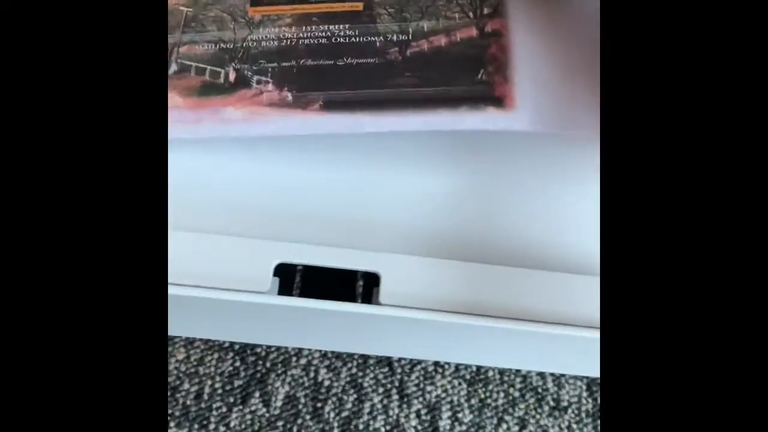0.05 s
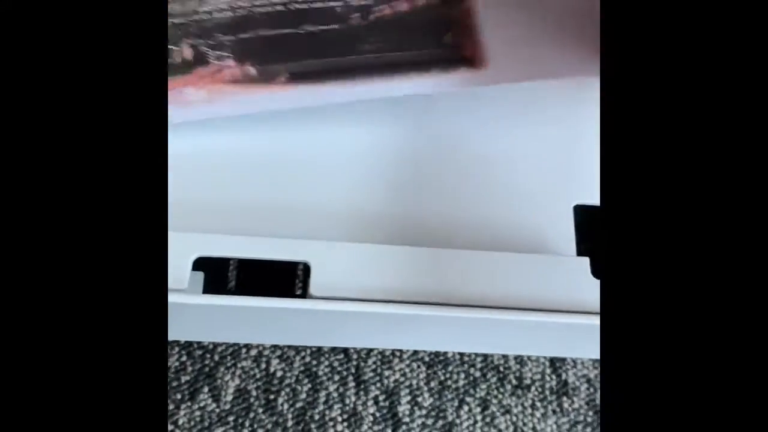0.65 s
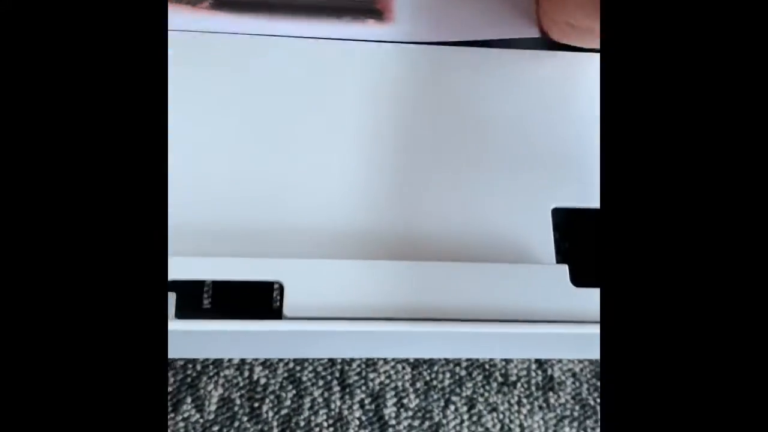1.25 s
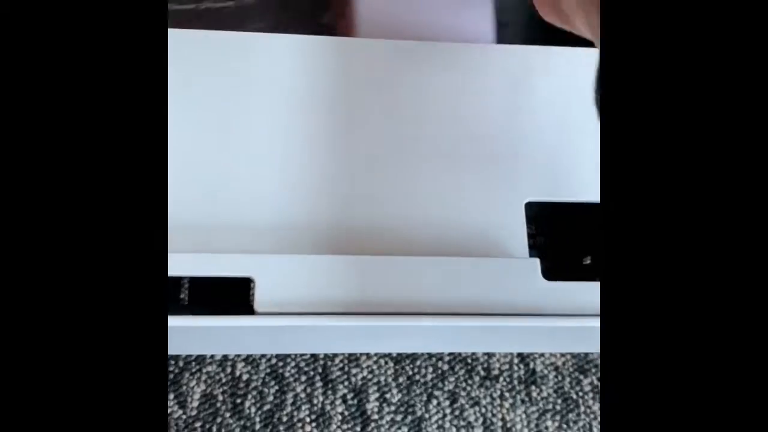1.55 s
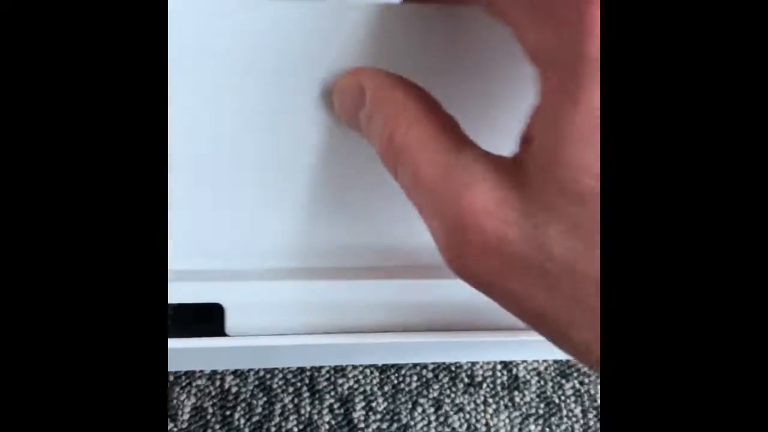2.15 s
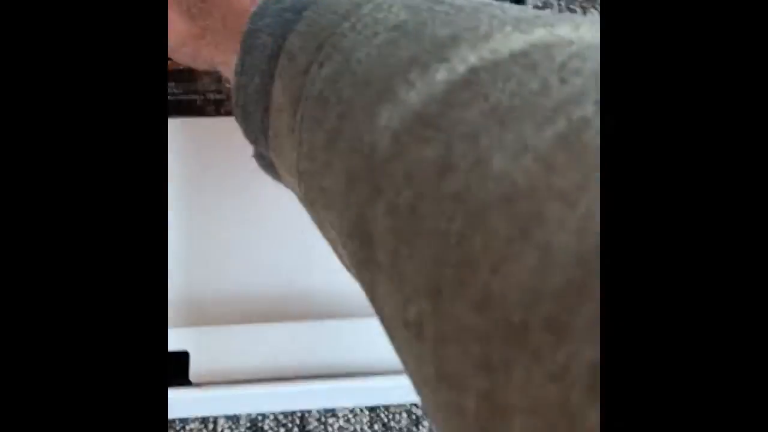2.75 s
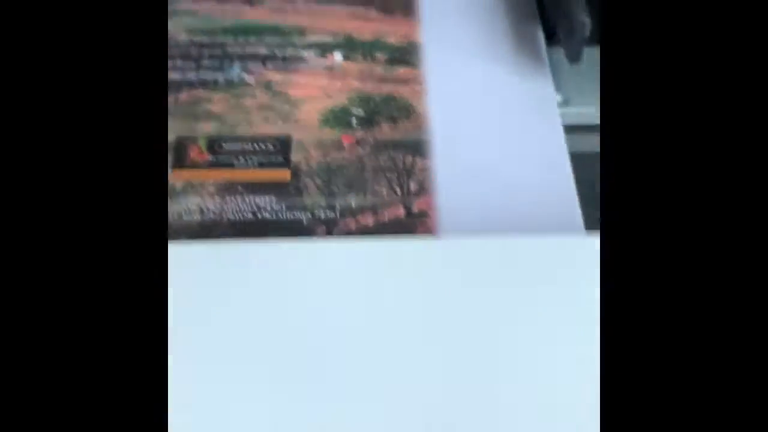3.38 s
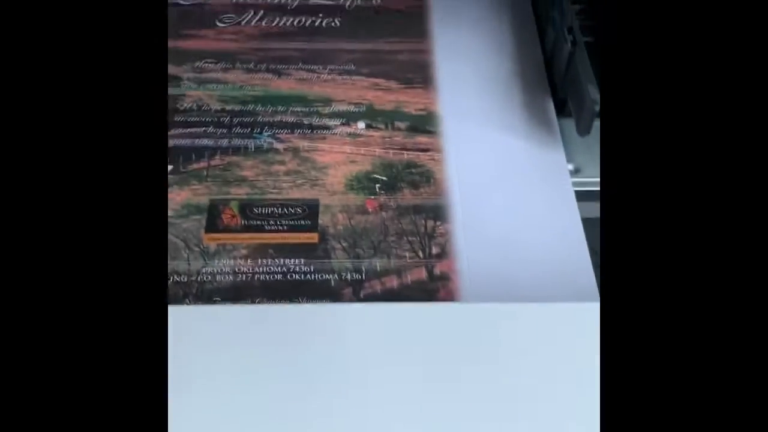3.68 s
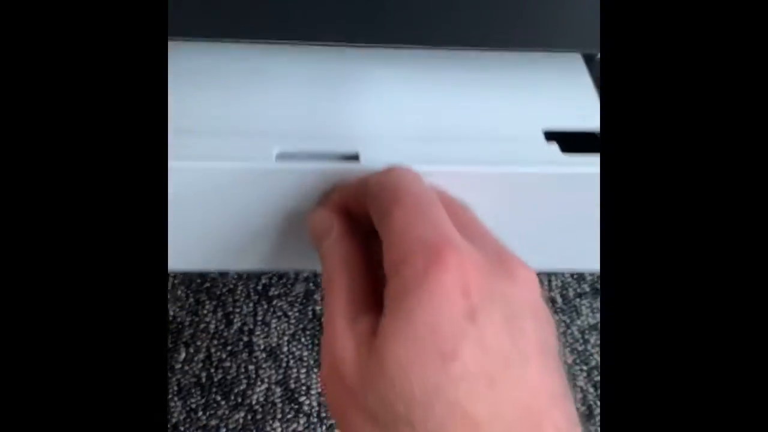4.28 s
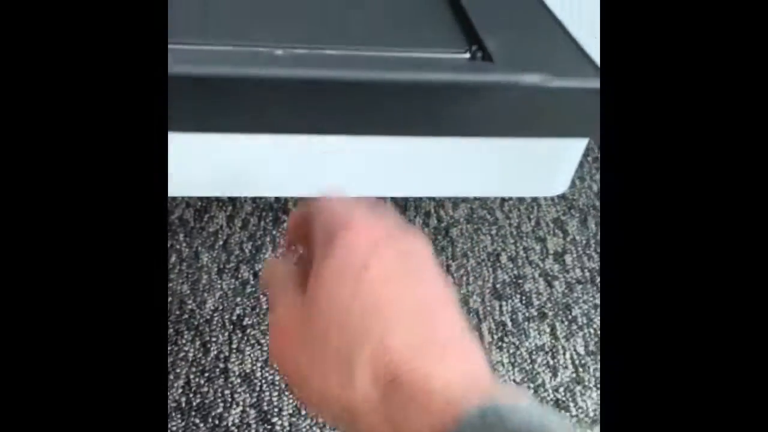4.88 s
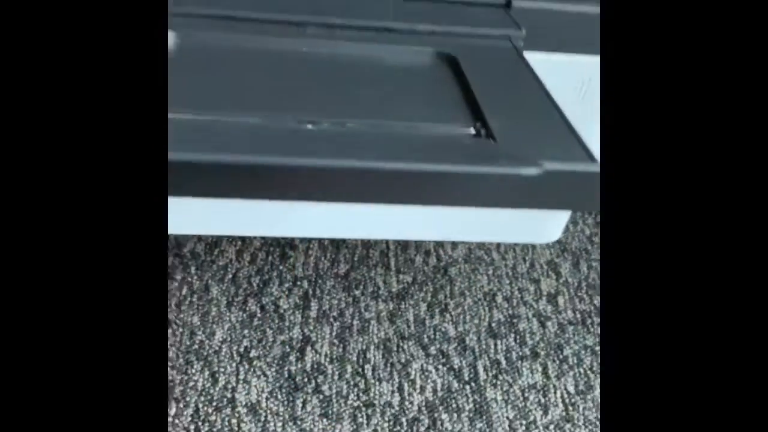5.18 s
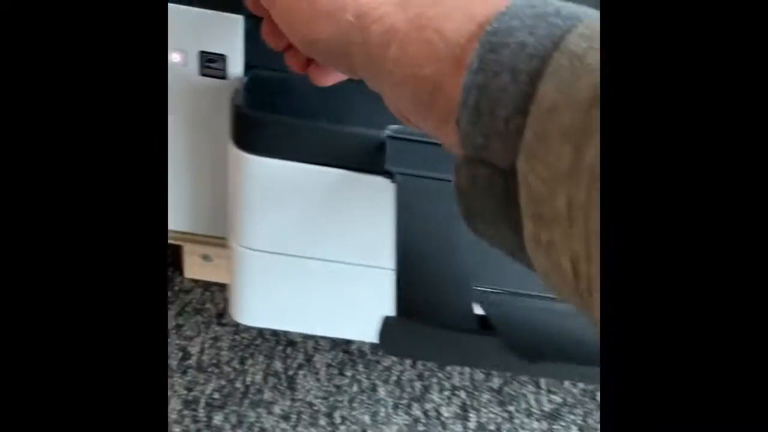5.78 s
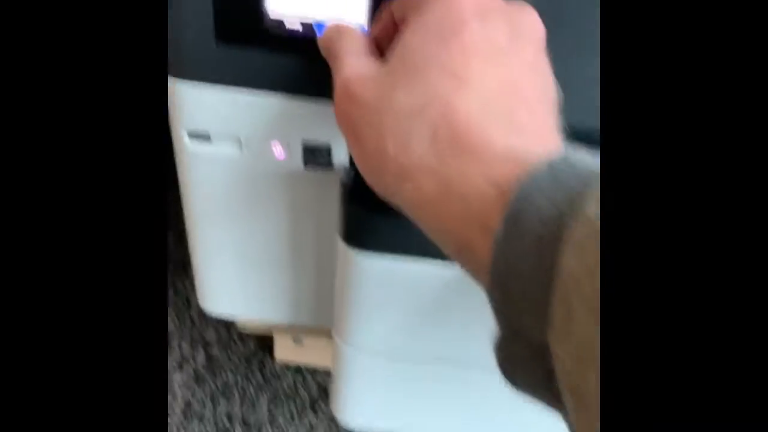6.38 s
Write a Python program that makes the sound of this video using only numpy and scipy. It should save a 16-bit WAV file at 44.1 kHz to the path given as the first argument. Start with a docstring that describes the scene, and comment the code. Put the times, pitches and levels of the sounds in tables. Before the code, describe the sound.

A machine hums low and steady in a room while paper rustles and taps lightly in a plastic printer tray, heard from close by. A quick run of plastic clicks and a few knocks follow as the guides are pushed up to the stack. Then the tray scrapes and clatters inward and shuts with a clunk, leaving only the hum and faint air.

```python
"""A carpeted room, close to a printer: sheets of paper are laid into its plastic tray.
The stack taps and rubs against the tray, the guides are pushed up to it, and the tray slides in
and latches. Impacts excite damped modes of paper and plastic; sliding makes stick-slip noise.
A machine hums low and steady behind it all, over the faint rush of the room air."""
import sys
import numpy as np
from scipy import signal
from scipy.fft import rfft, irfft, next_fast_len
from scipy.io import wavfile

SR = 44100
rng = np.random.default_rng(int(sys.argv[2]) if len(sys.argv) > 2 else 0)


def materialize(psi):
    """Save the field psi as 16-bit PCM at rate SR to the path in sys.argv[1].

    A 1-D psi becomes a single channel; in a 2-D psi each row is a channel.
    """
    bounded = np.clip(np.atleast_2d(psi).T, -1, 1)
    quanta = np.round(bounded * 32767).astype(np.int16)
    wavfile.write(sys.argv[1], SR, quanta)


N = 292817

EDGES = 25 * 2 ** np.arange(0, 9.6, .5)   # half-octave bands, Hz
CENTRES = np.sqrt(EDGES[1:] * EDGES[:-1])
# Spectra of the noises. Each row: frequency in Hz, spectral level in dB.
AIR_SPECTRUM = [(25, -52.5), (50, -38.5), (100, -44), (200, -47.5), (400, -49.5), (700, -55.5),
                (1200, -58.5), (2500, -68), (4500, -77), (6500, -95.5), (15000, -92)]
RUMBLE_SPECTRUM = [(30, -3.5), (80, 7.5), (180, 10), (400, -6), (900, -30.5), (3000, -59.5)]
RUB_SPECTRUM = [(100, 3.5), (250, 4.5), (500, 3.5), (900, -3), (1400, -5), (2000, 3.5), (4500, -10),
                (6500, -2), (9000, -7), (15000, -8)]
KNOCK_SPECTRUM = [(40, -12), (100, -7), (200, -2.5), (400, -4), (800, -6), (1400, -5), (2000, 5),
                  (4500, -7.5), (6000, -5), (9000, 2), (15000, -12)]
TAP_SPECTRUM = [(40, -12.5), (100, -2), (200, 13.5), (400, -6), (800, -4), (1400, -5), (2000, 6),
                (4500, -9), (6000, -5.5), (9000, -3), (15000, -8.5)]
# Likeness of the channels for air and near sounds. Each row: frequency in Hz, coherence from 0 to 1.
AIR_COHERENCE = [(100, 0.93), (300, 0.61), (700, 0.15), (2000, .1), (6000, 0.33), (9000, 1)]
NEAR_COHERENCE = [(100, .95), (600, .95), (1400, .75), (2100, .75), (3500, .4), (5500, .5), (8000, .94),
                  (15000, .92)]
# Balance of the near sounds. Each row: frequency in Hz, left over right in dB.
BALANCE = [(120, 1.5), (280, 0), (550, 5), (1000, 7), (1500, 1), (2200, 2), (4000, -1.5), (8000, -0.5),
           (15000, 0.5)]
# Partials of the hum. Each row: frequency in Hz, level in dB.
HUM_PARTIALS = [(123.8, -52), (166.9, -60.5), (215.3, -70.5), (253.0, -64.5), (290.7, -61), (355.3, -79.5)]
# The hum weakens at the end as the listener rises from the tray. Each row: time in seconds, gain in dB.
HUM_NEARNESS = [(0, 1.5), (5.2, 3), (6.6, 0)]
# Decay of the room and of the dense panel modes. Each row: frequency in Hz, T60 in seconds.
ROOM_T60 = [(100, 0.6), (500, 0.25), (2000, 0.32), (5000, 0.35), (9000, 0.061), (15000, 0.16)]
PANEL_T60 = [(100, 0.21), (400, .11), (1000, 0.082), (3000, 0.08), (8000, 0.048), (15000, 0.019)]
# Strongest modes of each part. Each row: frequency in Hz, bandwidth in Hz, gain in dB.
HOUSING_MODES = [(176.7, 13, 3.5), (325, 95, 3.5), (438, 20, -15), (580.6, 32, 6.5), (982, 17, 9),
                 (1155, 34, 3), (1580, 79, -0.5), (2427, 110, -7.5), (2767, 14, -5.5), (3480, 40, 8),
                 (3980, 42, -2.5), (7910, 120, -2)]
TRAY_MODES = [(172, 29, 0), (401, 64, 3), (570.6, 61, -9.5), (742, 47, 0), (893, 19, 6), (1284, 54, -5.5),
              (1459, 26, 6.5), (2146, 60, 3.5), (2560, 310, -11), (3330, 198.6, -7), (4187, 60, -12),
              (7700, 170, -20)]
GUIDE_MODES = [(178.6, 21, -1), (425, 38, -0.5), (630, 60, -4), (674, 36, 5.5), (910, 66, 2),
               (1010, 70, -11.5), (1560, 23, 7), (1754, 17, -6.5), (2007, 49, 2), (2470, 93, 1.5),
               (3240, 61, -2), (3630, 23.7, -3.5), (4730, 44, 6.5)]
PAPER_MODES = [(412.6, 12, 3.5), (620, 78, 1), (729, 35, -1.5), (822, 18, 7.5), (1070, 50, -10.5),
               (1170, 30, -1), (1570, 20, -7), (1900, 74, -7), (2024, 80.7, -2), (2600, 40, -1.5),
               (3530, 110, 2), (4060, 29, -14.5), (5150, 200, 5.5), (8150, 520, -11)]
# The rolling tray shakes the housing. Each row: start in seconds, length in seconds, level in dB.
TRAY_ROLLS = [(4.04, 0.11, -40.5), (4.557, 0.027, -29), (4.639, 0.1, -28)]
# The tray meets the housing, then the end stop. Each row: start in seconds, level in dB.
BOOMS = [(4.562, -24), (4.681, -19)]
# Blows with one clear pitch. Each row: start in seconds, frequency in Hz, level in dB.
PINGS = [(0.062, 790, -17.5), (0.558, 4760, -40), (0.619, 1183, -19.5), (0.671, 2350, -19),
         (0.924, 1600, -17.5), (0.987, 4910, -14), (1.112, 4910, -20.5), (1.111, 3750, -24),
         (1.2978, 1022, -21), (1.302, 580, -29), (1.55, 1240, -20.5), (2.765, 586, -11),
         (2.910, 417, -12.5), (4.482, 1070, -17), (4.762, 3000, -27.5), (4.868, 2720, -29)]
# The tray slides on its runners, and sheet over sheet.
# Each row: start in seconds, length in seconds, level in dB, hiss against body in dB.
TRAY_PUSHES = [(3.475, 0.15, -44.5, -8.5), (3.66, 0.033, -53.5, -5), (3.78, 0.44, -42, -14.5),
               (3.965, 0.067, -30, -10.5), (4.06, 0.15, -43, -14.5), (4.26, 0.23, -50, -10.5),
               (4.525, 0.23, -37.5, -18.5), (4.79, 0.14, -51.5, -32)]
PAPER_STROKES = [(0.0, 0.012, -41, -11.5), (0.06, 0.077, -43.5, -13.5), (0.235, 0.069, -44.5, -19),
                 (0.47, 0.15, -47, -8), (0.68, 0.05, -47, -18), (0.75, 0.082, -47, -10),
                 (0.89, 0.17, -44, -7.5), (1.07, 0.17, -47, -13.5), (1.34, 0.16, -42.5, -15.5),
                 (1.51, 0.19, -42.5, -17), (1.735, 0.065, -43.5, -16), (1.96, 0.036, -35, -18),
                 (2.04, 0.07, -44, -23), (2.29, 0.16, -44, -22), (2.38, 0.02, -27, -9.5),
                 (2.45, 0.055, -42, -22.5), (2.55, 0.037, -47, -26), (2.615, 0.061, -55, -6),
                 (2.80, 0.12, -41, -21), (2.90, 0.016, -38, -28)]
# Stick-slip. Each holds: catches per second, size against the steady rub, decay in seconds, grit in dB.
RUNNER_CATCHES = (75, 1.9, .003, 2.8)
PAPER_CATCHES = (55, 3.1, .003, 3.2)
# Impacts on plastic. Each row: start in seconds, level in dB, treble against body in dB.
HOUSING_KNOCKS = [(4.483, -17.5, -4.5), (4.561, -17, -9.5), (4.573, -18.5, -15.5), (4.585, -21.5, -10.5),
                  (4.604, -20.5, -13), (4.64, -15.5, -7), (4.659, -12.5, -9), (4.672, -6.5, -11.5),
                  (4.682, -8.5, -7), (4.693, -9, -13), (4.734, -22, -17), (4.865, -31, -8.5),
                  (6.153, -40, -25)]   # the latch, the end stop, a last touch
TRAY_KNOCKS = [(3.483, -34.5, -25), (3.528, -19.5, -14), (3.557, -22, -20), (3.596, -21, -24),
               (3.609, -19, -18), (3.681, -26, -17), (3.763, -14.5, -36), (3.774, -10, -23),
               (3.871, -20, -19.5), (3.95, -22.5, -3.5), (3.967, -7, -16.5), (4.002, -5, -11),
               (4.022, -8.5, -32), (4.035, -11.5, -12.5), (4.072, -16, -14.5), (4.139, -17, -19.5),
               (4.175, -27, -19), (4.206, -23, -34)]   # the tray rattles on its way in
GUIDE_KNOCKS = [(2.35, -28, -12.5), (2.378, -9, -7.5), (2.391, -4, -10), (2.405, -7.5, -6.5),
                (2.422, -14.5, -8), (2.433, -11.5, -12.5), (2.497, -27, -13), (2.745, -23.5, -10),
                (2.761, -9, -13), (2.774, -12.5, -38), (2.818, -42, -1), (2.908, -14.5, -11)]   # the guides ratchet along and knock home
# Sheets tap and flick in the tray. Each row: start in seconds, level in dB,
# treble against body in dB, factor on the decay time, leftward pan in dB.
PAPER_TAPS = [(0.062, -13.5, -27.5, 0.68, 2.5), (0.072, -15.5, -24, 0.7, 0), (0.26, -33.5, -15.5, .9, 1),
              (0.358, -23, -37, 1.1, 1), (0.465, -27.5, -24, 0.54, 1), (0.556, -25, -8.5, 0.78, -0.5),
              (0.618, -16, -14.5, 0.89, 1), (0.67, -16.5, -16.5, 0.58, 2), (0.718, -26, -50, 1, 1),
              (0.875, -23.5, -16, .9, 0.5), (0.925, -16, -11, 0.83, 0.5), (0.986, -15.5, -11.5, 0.73, 0),
              (1.112, -34.5, 6, 0.32, -5), (1.158, -17.5, -33, 0.95, -0.5), (1.3, -6, -24.5, 0.6, 0),
              (1.364, -25.5, -14, 0.77, 2), (1.49, -13.5, -16, 0.8, 2), (1.534, -25.5, -18, 1.4, 3.5),
              (1.675, -29, -13, 1.16, 1), (1.967, -21, -17.5, 0.89, -7.5), (1.976, -18.5, -12.5, 1.17, 6),
              (2.021, -31, -8.5, 0.93, 1)]


def from_db(db):
    """Amplitude ratio of a level in decibels."""
    return 10 ** (np.asarray(db) / 20)


def per_band(points):
    """A curve interpolated in log frequency at the band centres."""
    hz, values = np.transpose(points)
    return np.interp(np.log(CENTRES), np.log(hz), values)


def drift(rate_hz, count=N):
    """A slow random fluctuation of unit variance."""
    knots = rng.standard_normal(8192)
    return np.interp(np.arange(count) / SR * rate_hz, np.arange(len(knots)), knots) * np.sqrt(3 / 2)


def band_pass(x, k):
    """Band k, scaled so that white noise keeps its power per kilohertz of width."""
    sos = signal.butter(2, EDGES[k:k + 2], "band", fs=SR, output="sos")
    return signal.sosfilt(sos, x + 1e-18) * np.sqrt(SR / 2000)


def stereo(mid, side, coherence):
    """In-phase and antiphase signals mix into two channels of given coherence."""
    return np.sqrt((1 + coherence) / 2) * mid + np.sqrt((1 - coherence) / 2) * np.array([side, -side])


def placed(x, start):
    """A stereo sound delayed by start samples within the whole length."""
    return np.pad(x, ((0, 0), (start, N)))[:, :N]


def span(strokes):
    """First sample and times of the quarter seconds that hold the strokes and their tail."""
    first = round(np.floor(4 * max(strokes[0][0], 0)) / 4 * SR)
    last = round(np.ceil(4 * (strokes[-1][0] + strokes[-1][1]) + 1) / 4 * SR)
    return first, np.arange(first, last) / SR


def swell(t, start, length, attack_s, fade_db_per_s):
    """Envelope of a stroke: linear rise, hold, exponential decay."""
    return np.clip((t - start) / attack_s, 0, 1) * from_db(-fade_db_per_s * np.maximum(t - start - length, 0))


def damped_tone(start, hz, db, t60, rise_s):
    """Free vibration of one mode: an exponentially decaying sinusoid, alike in both channels."""
    t = np.arange(SR // 2) / SR
    envelope = np.exp(-np.log(1000) * t / t60) * (1 - np.exp(-t / rise_s))
    wave = from_db(db) * np.sin(2 * np.pi * hz * t) * envelope
    return placed(np.array([wave, wave]), round(start * SR))


def grains(count, grit_db):
    """Dense tiny contacts, spread in size by grit_db, sum to mid and side noise of unit rms."""
    sizes = from_db(np.repeat(grit_db * rng.standard_normal(count // 16 + 1), 16)[:count])
    return rng.standard_normal((2, count)) * sizes / np.sqrt(np.mean(sizes ** 2))


def radiate(drives, spectrum, coherence, grit_db):
    """Superposition of stereo noise bands, each modulated by its own drive."""
    streams = [grains(np.shape(drives[0])[-1], grit_db) for _ in range(2)]
    gains, coherences = from_db(per_band(spectrum)), np.clip(per_band(coherence), 0, 1)
    return sum(gain * band_pass(stereo(*streams[k % 2], alike) * drive, k)
               for k, (drive, gain, alike) in enumerate(zip(drives, gains, coherences)))


def room_air():
    """Stationary noise of the room, strongest in the bass."""
    return radiate([np.ones(N)] * len(CENTRES), AIR_SPECTRUM, AIR_COHERENCE, grit_db=0)


def machine_hum(level_db, waver_db, wander_rad):
    """Low machine partials waver under slight random amplitude and phase modulation."""
    t = np.arange(N) / SR
    near_db = level_db + np.interp(t, *np.transpose(HUM_NEARNESS))
    out = 0
    for hz, db in HUM_PARTIALS:
        amplitude = from_db(db + near_db + waver_db * drift(6.9)) * np.sqrt(2)
        out = out + amplitude * np.sin(2 * np.pi * hz * t + wander_rad * drift(4.3))
    return out


def reverberation(x, bass_db, treble_db, delay_s):
    """Diffuse reflections decay exponentially in each band; the bass lasts longest."""
    t = np.arange(SR // 2) / SR
    wet = from_db(per_band([(500, bass_db), (8000, treble_db)]))
    coherences = np.clip(per_band(NEAR_COHERENCE), 0, 1)
    tail = 0
    for k, (t60, alike) in enumerate(zip(per_band(ROOM_T60), coherences)):
        fade = np.exp(-np.log(1000) * t / t60) * np.clip(t / delay_s - 1, 0, 1)
        noise = stereo(*rng.standard_normal((2, len(t))), alike)
        tail = tail + wet[k] * band_pass(noise * fade / np.linalg.norm(fade), k) / np.sqrt(SR / 2000)
    return signal.fftconvolve(x, tail, axes=1)[:, :N]


def balance(x):
    """A level difference between the channels that varies with frequency."""
    size = next_fast_len(N)
    left_db = np.interp(np.arange(size // 2 + 1) * SR / size, *np.transpose(BALANCE))
    return irfft(rfft(x, size) * from_db([left_db / 2, -left_db / 2]), size)[:, :N]


def resonate(x, modes, direct_db, modes_db, echo_gain):
    """Resonance: a part rings in its strongest modes, and the tray walls add early reflections."""
    out = from_db(direct_db) * x
    for hz, width, db in modes:
        radius = np.exp(-np.pi * width / SR)
        zeros = np.array([1, 0, -1]) * (1 - radius ** 2) / 2
        poles = [1, -2 * radius * np.cos(2 * np.pi * hz / SR), radius ** 2]
        out = out + from_db(db + modes_db) * signal.lfilter(zeros, poles, x + 1e-18)
    high_pass = signal.butter(2, 1500, "high", fs=SR, output="sos")   # small walls return only short waves
    bright = signal.sosfilt(high_pass, out + 1e-18)
    return out + echo_gain * sum(placed(bright, round(s * SR)) for s in rng.uniform(.0006, .005, size=4))


def tray_rumble(attack_s, fade_db_per_s, judder_db, judder_hz):
    """Forced vibration: the rolling tray judders and shakes the housing."""
    first, t = span(TRAY_ROLLS)
    push = sum(from_db(db) * swell(t, s, length, attack_s, fade_db_per_s) for s, length, db in TRAY_ROLLS)
    drive = push * from_db(judder_db * drift(judder_hz, len(t)))
    drives = [drive] * np.sum(CENTRES < 2000)
    return placed(radiate(drives, RUMBLE_SPECTRUM, NEAR_COHERENCE, grit_db=0), first)


def housing_booms(hz, t60, rise_s):
    """Struck by the tray, the hollow housing rings in one low mode."""
    return sum(damped_tone(start, hz, db, t60, rise_s) for start, db in BOOMS)


def pings(t60_at_1khz, shortening, rise_s):
    """A taut sheet edge or a panel rings in one mode; damping grows as a power of frequency."""
    return sum(damped_tone(start, hz, db, t60_at_1khz * (1000 / hz) ** shortening, rise_s)
               for start, hz, db in PINGS)


def friction(strokes, catches, attack_s, fade_db_per_s, rasp_db, pressure_db, pressure_hz):
    """Stick-slip friction: surfaces catch and let go in spurts; they hiss, the plastic answers lower."""
    catches_per_s, catch_size, catch_s, grit_db = catches
    first, t = span(strokes)
    power = 0
    for start, length, db, hiss_db in strokes:
        gains = from_db([[db], [db + hiss_db / 2 + rasp_db], [db + hiss_db]])   # body, rasp, hiss
        power = power + (gains * swell(t, start, length, attack_s, fade_db_per_s)) ** 2
    caught = rng.random(len(t)) < catches_per_s / SR
    slips = caught * catch_size * rng.random(len(t)) ** 2   # mostly small, a few sharp
    spurts = signal.lfilter([1], [1, -np.exp(-1 / (catch_s * SR))], slips + 1e-18)
    pressure = from_db(pressure_db * drift(pressure_hz, len(t)))   # the hand presses unevenly
    body, rasp, hiss = np.sqrt(power) * pressure * (1 + spurts)
    drives = [body if hz < 1600 else rasp if hz < 5000 else hiss for hz in CENTRES]
    return placed(radiate(drives, RUB_SPECTRUM, NEAR_COHERENCE, grit_db), first)


def impacts(table, spectrum, thump_db, thump_slope, clack_db, snap_db, ring, rise_s, grit_db, pan_db=0):
    """Impacts excite dense panel modes, the high ones dying first; harder contact gives more treble."""
    starts = np.array([round(row[0] * SR) for row in table])
    first, t = starts.min(), np.arange(SR // 5) / SR
    power = np.zeros((len(CENTRES), 2, starts.max() - first + len(t)))
    t60 = ring * per_band(PANEL_T60)[:, None]
    rise = 1 - np.exp(-t / rise_s)
    for at, (_, body, treble, *own) in zip(starts - first, table):
        # loose sheets land anywhere; a rigid part always rings alike, from one place
        stretch, pan = own or (1, pan_db)
        thump = thump_db + thump_slope * body
        clack, snap = body + treble + clack_db, body + treble + snap_db
        levels = [(200, thump), (420, body), (1250, body), (2000, clack), (4400, clack), (6500, snap)]
        decay = np.exp(-np.log(1000) * t / (t60 * max(stretch, .1)))
        envelope = from_db(per_band(levels))[:, None] * decay * rise
        power[:, :, at:at + len(t)] += envelope[:, None] ** 2 * from_db([[pan], [-pan]])
    return placed(radiate(np.sqrt(power), spectrum, NEAR_COHERENCE, grit_db), first)


def scene():
    """Source and filter: four parts sound through their own modes and the room, over air and hum."""
    paper = impacts(PAPER_TAPS, TAP_SPECTRUM, thump_db=-34.5, thump_slope=0.18, clack_db=3.45,
                    snap_db=-2, ring=1.0, rise_s=0.000084, grit_db=3.5)
    paper += friction(PAPER_STROKES, PAPER_CATCHES, attack_s=0.0067, fade_db_per_s=189,
                      rasp_db=-1.5, pressure_db=1.66, pressure_hz=22)
    guides = impacts(GUIDE_KNOCKS, KNOCK_SPECTRUM, thump_db=-21, thump_slope=0.21, clack_db=-1.15,
                     snap_db=-4.5, ring=0.98, rise_s=0.0018, grit_db=0.5, pan_db=0.5)
    tray = impacts(TRAY_KNOCKS, KNOCK_SPECTRUM, thump_db=-14, thump_slope=1.0, clack_db=1.5,
                   snap_db=-1.5, ring=0.82, rise_s=0.0026, grit_db=1.0, pan_db=0.9)
    tray += friction(TRAY_PUSHES, RUNNER_CATCHES, attack_s=0.0082, fade_db_per_s=226.5,
                     rasp_db=0.5, pressure_db=1.3, pressure_hz=27)
    housing = impacts(HOUSING_KNOCKS, KNOCK_SPECTRUM, thump_db=-14.5, thump_slope=0.65, clack_db=-1.5,
                      snap_db=-5.5, ring=1.036, rise_s=0.00088, grit_db=4.5, pan_db=-0.5)
    housing += tray_rumble(attack_s=.03, fade_db_per_s=351, judder_db=5.0, judder_hz=40)
    near = resonate(paper, PAPER_MODES, direct_db=-5.5, modes_db=-6.5, echo_gain=0.14)
    near += resonate(guides, GUIDE_MODES, direct_db=-4.0, modes_db=-2.0, echo_gain=0.45)
    near += resonate(tray, TRAY_MODES, direct_db=-2.5, modes_db=-2.5, echo_gain=0.25)
    near += resonate(housing, HOUSING_MODES, direct_db=-3.5, modes_db=-3.0, echo_gain=0.78)
    near += pings(t60_at_1khz=0.031, shortening=0.13, rise_s=0.000786)
    near += housing_booms(hz=181.8, t60=0.29, rise_s=0.0013)
    near = balance(near)
    air = room_air()
    room = reverberation(near, bass_db=-14.5, treble_db=-18.5, delay_s=.007)
    return near + room + air + machine_hum(level_db=-0.44, waver_db=-1.0, wander_rad=0.99)


def record(dry):
    """Phase delay: the left microphone lags in the treble. Peaks saturate softly and the top is cut."""
    lag_s, split_hz, cutoff_hz = 0.0002565, 1524, 15900
    size = next_fast_len(N + SR // 10)
    hz = np.arange(size // 2 + 1) * SR / size
    lag = lag_s * (1 + np.tanh((hz - split_hz) / 200)) / 2
    heard = irfft(rfft(dry, size) * np.exp(1j * np.pi * hz * lag * [[-1], [1]]), size)
    rounded = heard / (1 + heard ** 4) ** (1 / 4)
    low_pass = 1 / np.sqrt(1 + (hz / cutoff_hz) ** 200)
    return irfft(rfft(rounded) * low_pass, size)[:, :N]


dry = scene()
out = record(dry)
materialize(out)
```